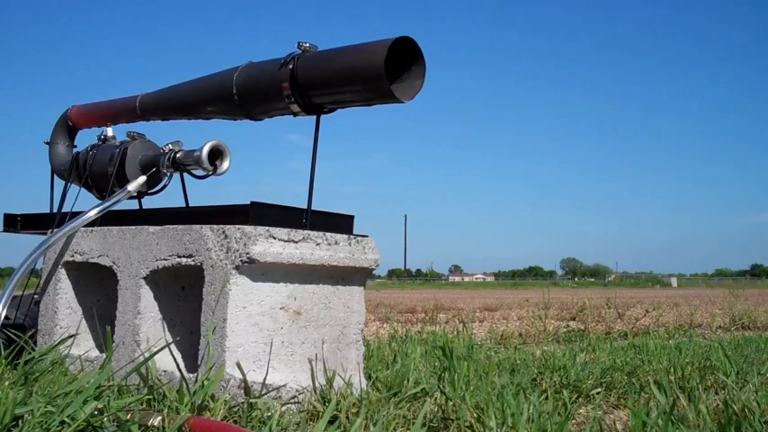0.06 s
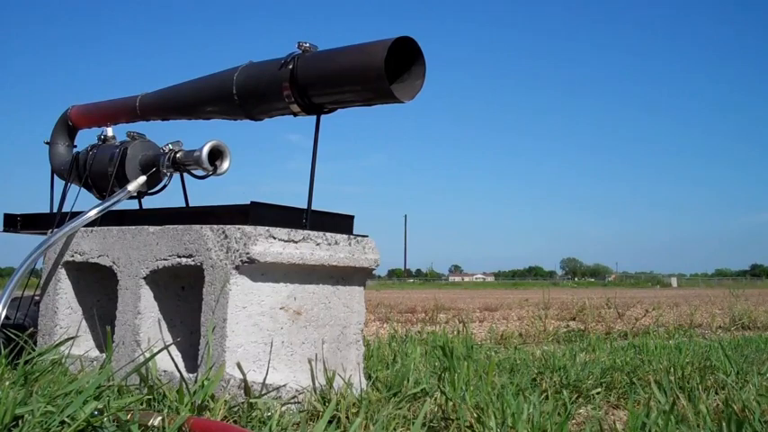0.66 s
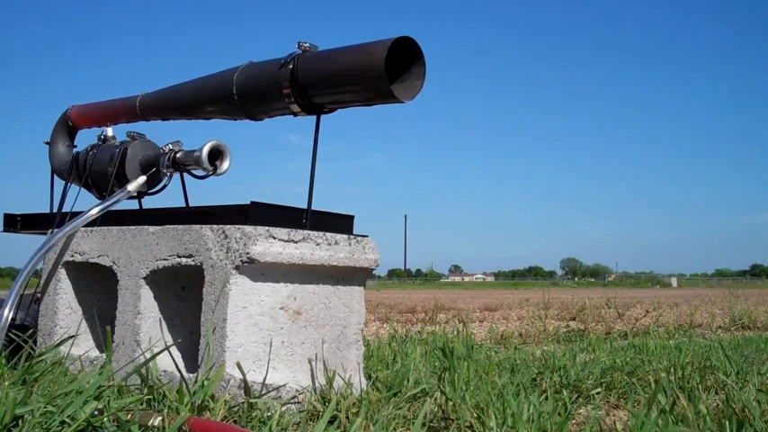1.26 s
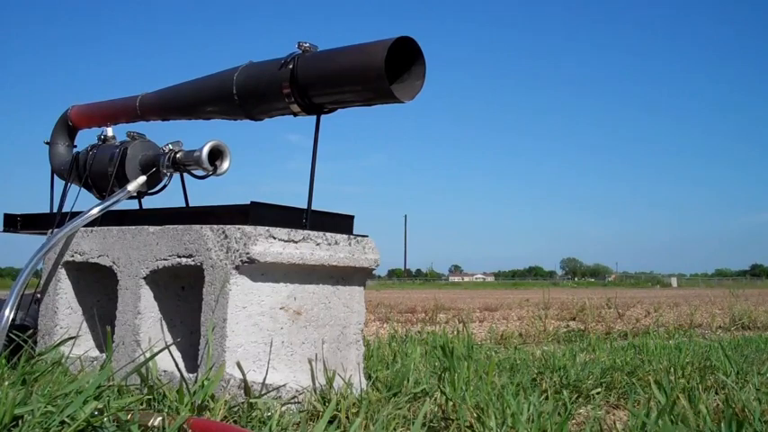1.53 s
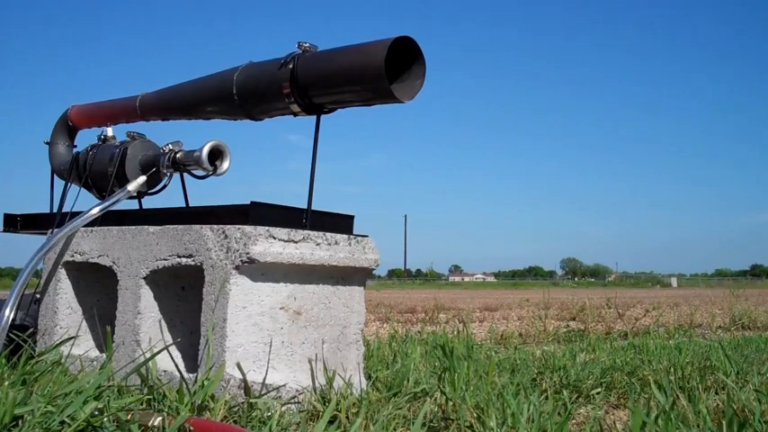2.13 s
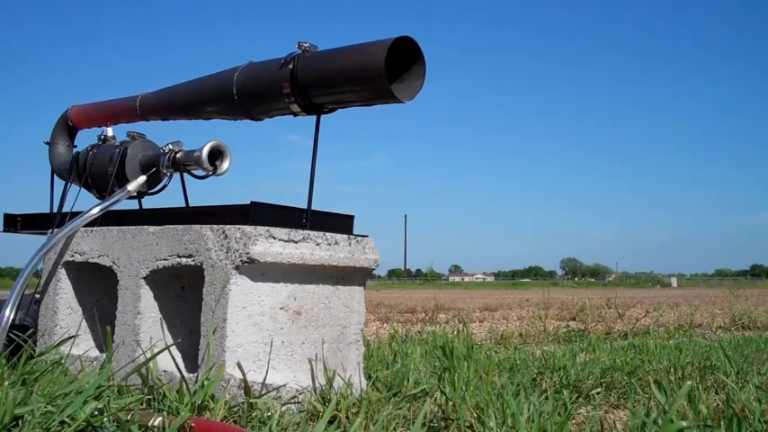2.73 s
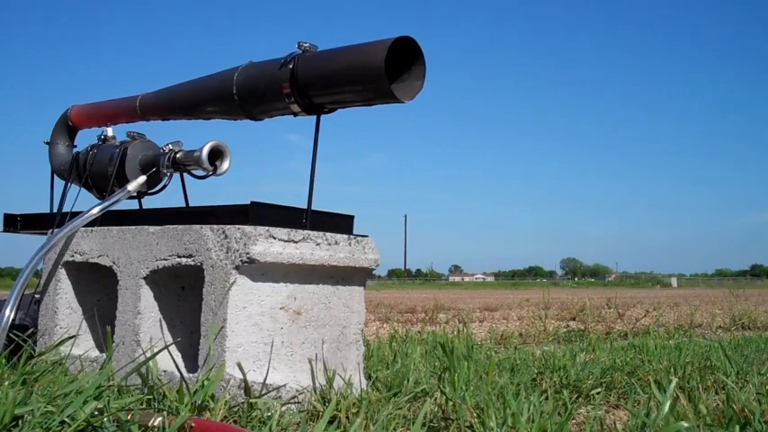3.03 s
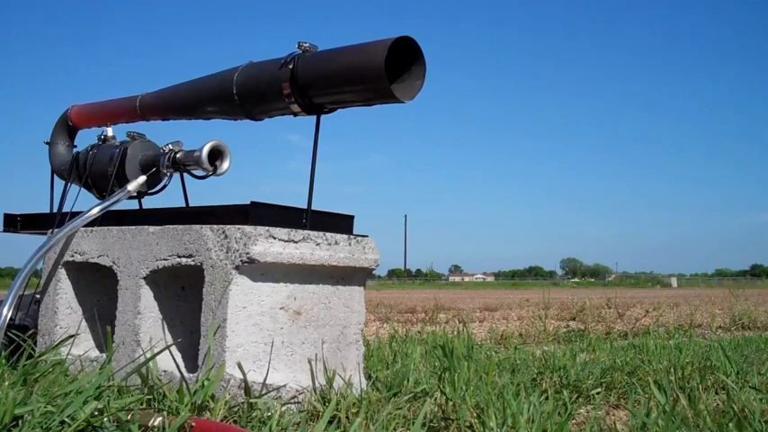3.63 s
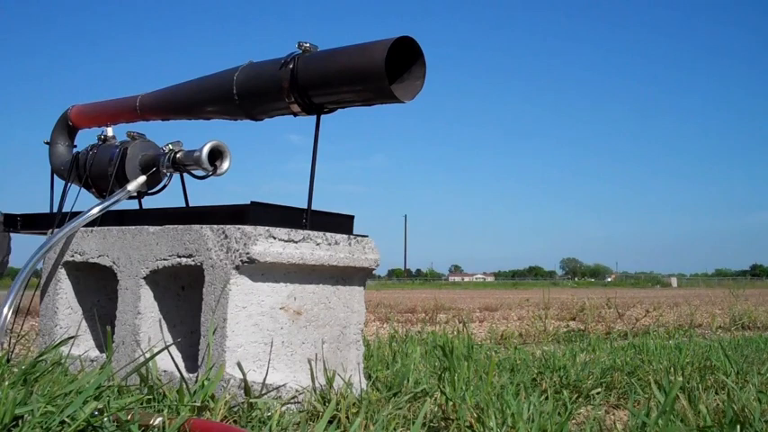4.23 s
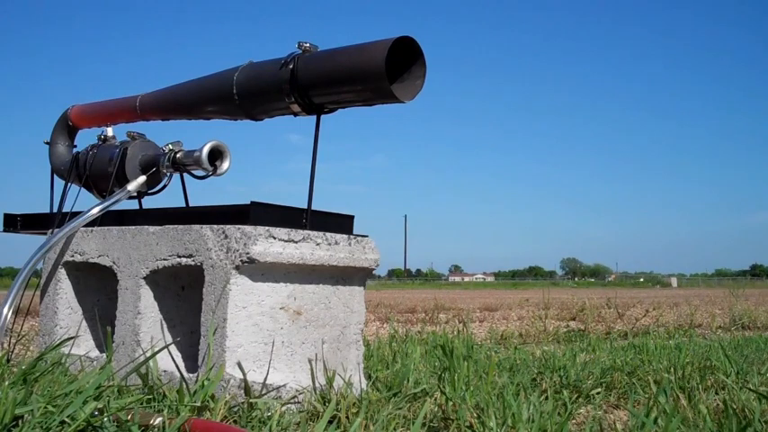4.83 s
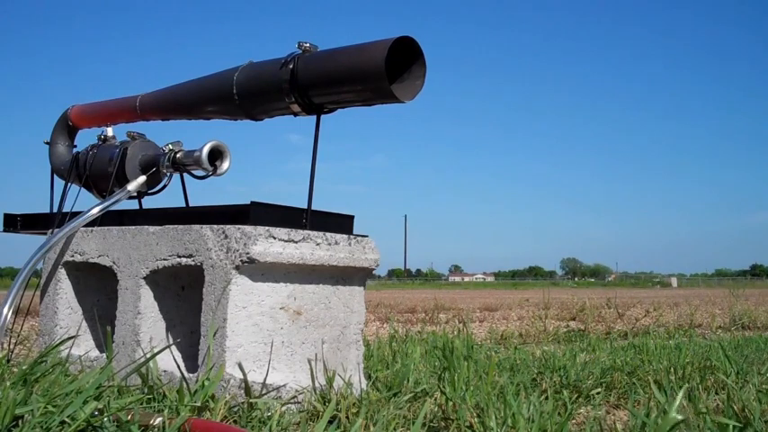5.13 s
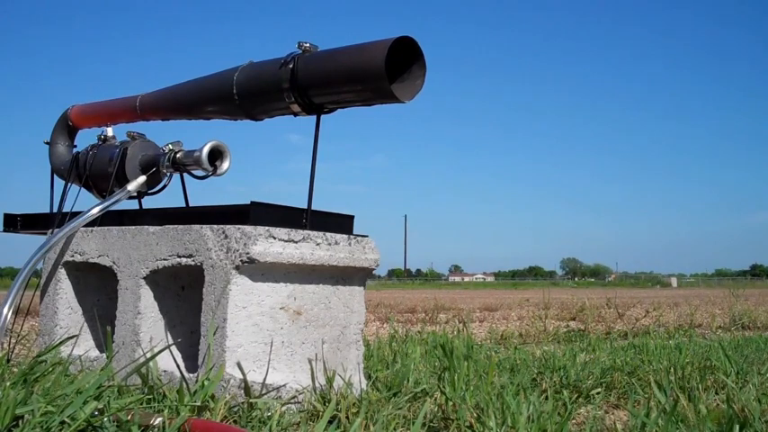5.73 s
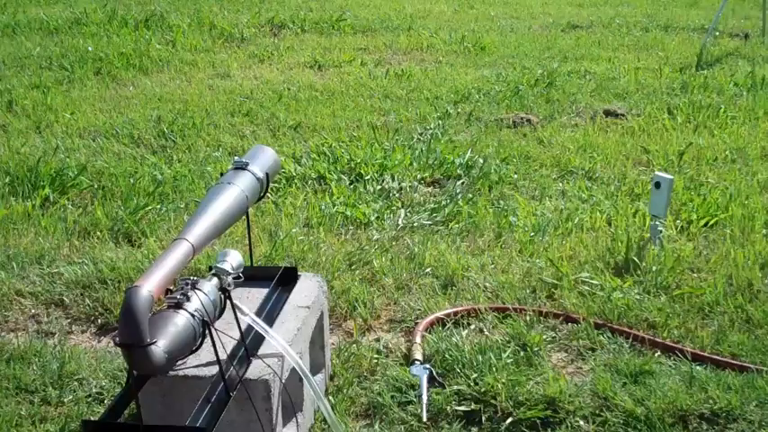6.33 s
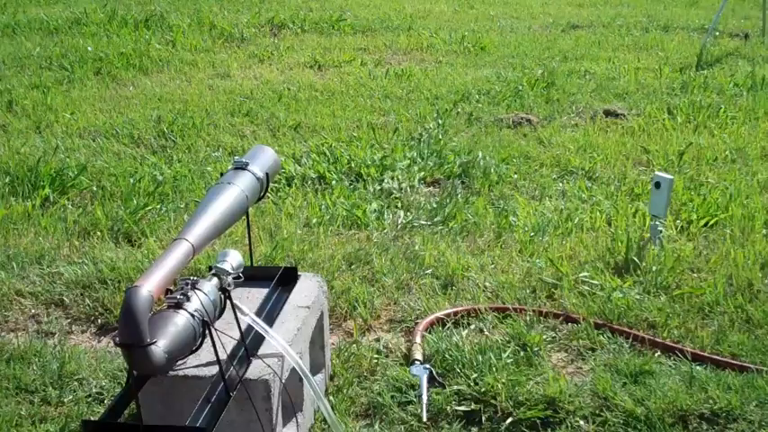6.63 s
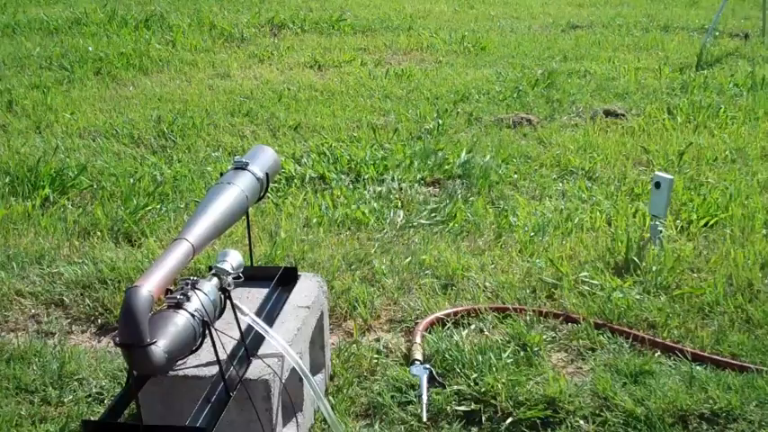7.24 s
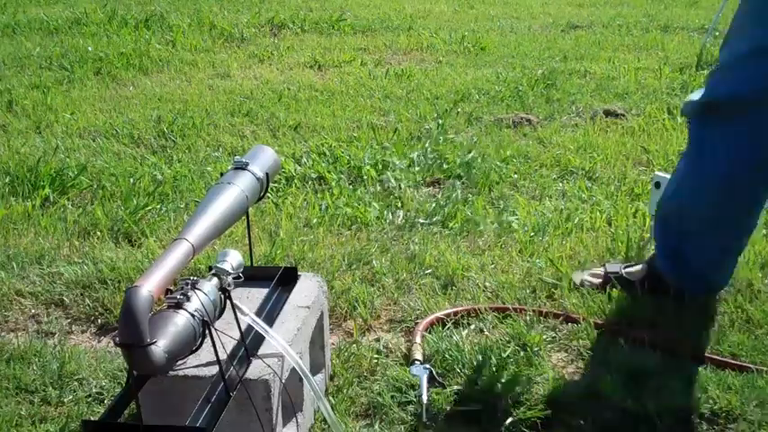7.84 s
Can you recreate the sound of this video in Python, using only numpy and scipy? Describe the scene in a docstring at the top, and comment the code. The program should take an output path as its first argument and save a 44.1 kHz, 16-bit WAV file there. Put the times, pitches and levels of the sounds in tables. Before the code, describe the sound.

A small pulse jet engine running very close in an open field, a loud, harsh, distorted buzzing roar at one steady pitch.

```python
"""A small valveless pulse jet buzzes in an open field from the first instant, hunting around 214 firings a
second. In each cycle the gas column swings like a sine, the intake roars, then a shock front and a
turbulent blast leave the ringing tailpipe. The microphone is so close that it overloads: the wave is
squared off, then thinned by the bass cut. Near 4 s the intake sucks hardest, near 5.6 s the shocks
peak, and in the last second the suction fades while the engine runs on."""
import sys
import numpy as np
from scipy import signal
from scipy.fft import rfft, irfft, next_fast_len
from scipy.io import wavfile

SR = 44100
rng = np.random.default_rng(int(sys.argv[2]) if len(sys.argv) > 2 else 0)


def wrap_up_sound(samples):
    """Save the sound to the file named by the first command line argument, as 16-bit audio."""
    columns = np.atleast_2d(samples).T
    # keep every value between -1 and 1, then stretch to whole-number steps
    tamed = np.clip(columns, -1, 1)
    steps = np.round(tamed * 32767).astype(np.int16)
    wavfile.write(sys.argv[1], SR, steps)


N = 347508


def from_db(db):
    """Decibels to gain."""
    return 10 ** (np.asarray(db) / 20)


def unit_rms(x):
    """Scale to rms 1."""
    return x / np.sqrt(np.mean(x ** 2) + 1e-20)


def automation(rows):
    """One curve per column of a timed table, gliding from row to row."""
    seconds, *columns = np.transpose(rows)
    return [np.interp(np.arange(N) / SR, seconds, column) for column in columns]


def eq_db(points, hz):
    """Read an EQ curve on a log-frequency axis."""
    points = np.array(points)
    return np.interp(np.log(hz + 1), np.log(points[:, 0]), points[:, 1])


def filtered(x, response):
    """Pass x through a frequency response given as a function of Hz."""
    size = next_fast_len(N + SR // 10)
    hz = np.arange(size // 2 + 1) * SR / size
    return irfft(rfft(x, size) * response(hz), size)[..., :N]


def shaped_noise(response):
    """White noise through a frequency response; rms 1."""
    return unit_rms(filtered(rng.standard_normal(N), response))


def noise(spectrum):
    """Noise coloured by an EQ curve; rms 1."""
    return shaped_noise(lambda hz: from_db(eq_db(spectrum, hz)))


def drift(width_hz, centre_hz=0):
    """Smooth random modulation at rates within about width_hz of centre_hz; rms 1."""
    return shaped_noise(lambda hz: 1 / (1 + ((hz - centre_hz) / width_hz) ** 4))


def per_firing(cycles):
    """Sample and hold: one normal draw for each firing."""
    return rng.standard_normal(N // 100)[np.maximum(cycles, 0).astype(int)]


def bell_gate(cycles, centre, width):
    """A bell-shaped opening once a firing; centre and width in cycles."""
    away = (cycles - centre + .5) % 1 - .5
    return np.exp(-.5 * (away / width) ** 2)


# The engine's base pitch. Each row: time in seconds, firing rate in Hz.
FIRING_RATE = [(0.0, 213.7), (2.76, 214.2), (2.86, 212.1), (2.96, 213.9), (3.54, 210.8), (4.04, 215.5),
               (4.54, 213.2), (5.6, 214.8), (5.72, 213.1), (5.9, 215.5), (6.0, 212.8), (6.16, 215.3),
               (6.44, 213.9), (6.74, 216.1), (6.96, 213.5), (7.38, 214.2), (7.58, 212.1), (7.88, 214.1)]


def firing_clock(hunt, hunt_hz=0.594, wander_cycles=0.017):
    """Running count of cycles: the rate hunts, and the firing runs a little ahead of or behind its beat."""
    base_hz, = automation(FIRING_RATE)
    beat = 1 + np.cumsum(base_hz + hunt_hz * hunt) / SR
    return beat + wander_cycles * drift(width_hz=37.5)


def gas_column(cycles, mean_pressure):
    """The fundamental: the gas swings about a wandering mean. Its amplitude is one 'swing' of pressure."""
    return mean_pressure + 0.024 * drift(width_hz=26) - np.sin(2 * np.pi * cycles)


# Colour of the intake turbulence. Each row: frequency in Hz, relative noise density in dB.
INTAKE_SPECTRUM = [(40, -4), (300, -12), (680, -10), (970, -5), (1400, 0.5), (2000, -8), (3700, -9),
                   (7000, -19), (14000, -29)]


def intake_roar(envelope, flame_db=-33.5):
    """Turbulence swells as the intake opens, over a faint steady bed of flame noise."""
    return (envelope + from_db(flame_db)) * noise(INTAKE_SPECTRUM)


def shock_front(cycles, moment, height, rise_cycles=0.024, decay_cycles=0.13, rings_per_cycle=2.9):
    """A steep front, its height new at each firing, that dies away while the pipe mouth rings."""
    age = cycles % 1 - moment
    after = np.maximum(age, 0)
    attack = .5 + .5 * np.tanh(age / rise_cycles)
    decay = np.exp(-after / decay_cycles)
    ring = 1 + 0.21 * np.cos(2 * np.pi * rings_per_cycle * after)
    return height * (1 + 0.063 * per_firing(cycles)) * attack * decay * ring


# Fader ride on the tailpipe blast. Each row: time in seconds, base level in dB.
BLAST_LEVEL = [(0, -13), (0.4, -9), (1.1, -10), (1.95, -7), (2.2, -12), (2.7, -11.5), (3.55, -14),
               (3.95, -9.5), (4.9, -12.5), (5.5, -14), (5.75, -13), (6.45, -13.5), (7.88, -15)]
# Colour of the blast's turbulence. Each row: frequency in Hz, relative noise density in dB.
BLAST_SPECTRUM = [(40, -23), (300, -26), (900, -12.5), (1900, -5.5), (2600, 4), (3000, -0.5), (3400, 3.5),
                  (4150, -3), (4550, -1), (5100, -6.5), (7000, -6), (14000, -31)]


def tailpipe_blast(cycles, moment, hunt, lag_cycles=0.15, hunt_db=0.77, spread_db=1.5):
    """The long tailpipe blows a bright, turbulent puff after each shock; returns sound and envelope."""
    base_db, = automation(BLAST_LEVEL)
    level_db = base_db + hunt_db * hunt + spread_db * per_firing(cycles)
    envelope = bell_gate(cycles, moment + lag_cycles, width=0.12) * from_db(level_db)
    return envelope * noise(BLAST_SPECTRUM), envelope


# The pipe's resonances. Each row: pitch in Hz, bandwidth in Hz, base level in dB.
PIPE_RESONANCES = [(444.6, 11, -35), (898, 71, -25), (1310, 77, -21.5), (3445, 240, -33)]


def pipe_hum():
    """Higher modes of the pipe, kept ringing through the whole cycle by the flame."""
    hum = 0
    for mode_hz, width_hz, level_db in PIPE_RESONANCES:
        mode = shaped_noise(lambda hz: hz / (hz * width_hz + 1j * (hz ** 2 - mode_hz ** 2)))
        hum = hum + from_db(level_db) * mode
    return hum


# The fizz of the finest eddies. Each row: frequency in Hz, relative noise density in dB.
EDDY_SPECTRUM = [(100, 0), (1000, 0), (3500, -1.5), (7000, -4.5), (10000, 3.5), (14000, 4.5)]


def fine_eddies(envelope, gain_db=-4.0):
    """Stereo fizz: eddies so small that they differ between the two microphone ports."""
    return from_db(gain_db) * envelope * np.array([noise(EDDY_SPECTRUM), noise(EDDY_SPECTRUM)])


# How hard the engine burns. Each row: time in seconds, then mean pressure, base shock height and
# intake suction (negative), all three in swings of the gas column.
COMBUSTION_CURVES = [(0, -0.029, 1.09, -0.95), (1.3, 0.039, 0.95, -0.84), (2.7, 0.046, 0.98, -1.02),
                     (3.45, 0.036, 0.81, -0.62), (4.0, 0.14, 1.18, -2.4), (4.55, 0.059, 1.07, -1.85),
                     (5.05, -0.092, 1.37, -1.5), (5.3, -0.18, 1.17, -0.66), (5.55, -0.26, 1.56, -0.75),
                     (6.0, -0.077, 0.96, -0.69), (6.35, -0.0041, 1.27, -1.64), (6.72, -0.12, 1.07, -0.32),
                     (7.1, -0.13, 1.09, -0.84), (7.5, -0.16, 0.99, -0.055), (7.88, -0.21, 0.98, -0.093)]


def pulse_jet(intake_lead_cycles=0.16, roar_db_per_swing=3.5, hum_db_per_swing=5.5):
    """The firings drive every layer; returns the pressure at the two microphone ports, in swings."""
    mean_pressure, height, suction = automation(COMBUSTION_CURVES)
    # the engine hunts, nearly regularly: as the firing speeds up, shock and blast grow
    hunt = drift(width_hz=1.521, centre_hz=3.333)
    height = height * (1 + 0.034 * hunt)
    cycles = firing_clock(hunt)
    swing = gas_column(cycles, mean_pressure)
    # a higher shock comes earlier in the cycle, with a louder roar and hum
    excess = height - 1
    moment = 0.3409 - 0.057 * excess
    # no two charges burn alike, so the shock's timing wanders and jitters
    moment = moment + 0.0066 * drift(width_hz=26) + 0.0084 * per_firing(cycles)
    # the short intake breathes ahead of the shock
    intake_open = bell_gate(cycles, moment - intake_lead_cycles, width=0.088)
    intake_envelope = intake_open * from_db(-3.5 + roar_db_per_swing * excess)
    front = shock_front(cycles, moment, height)
    blast, blast_envelope = tailpipe_blast(cycles, moment, hunt)
    roar = intake_roar(intake_envelope)
    hum = from_db(hum_db_per_swing * excess) * pipe_hum()
    eddies = fine_eddies(blast_envelope + 0.58 * intake_envelope)
    return swing + suction * intake_open + roar + front + blast + hum + eddies


def scene():
    """The engine alone: the open field gives no echo."""
    return pulse_jet()


def overload(pressure, drive=2.88, ceiling=0.47, knee=3.7):
    """The microphone saturates at its ceiling; a higher knee makes the corner harder."""
    driven = drive * pressure
    return ceiling * driven / (1 + np.abs(driven) ** knee) ** (1 / knee)


# The microphone's tone. Each row: frequency in Hz, gain in dB.
MICROPHONE_EQ = [(30, -2), (214, 0), (320, -2.5), (430, -0.5), (620, 4), (730, -1.5), (870, 2),
                 (1500, -0.5), (1900, -1.5), (3400, -0.5), (5000, -1.5), (6500, -3.5), (8000, -9),
                 (9500, -9.5), (12000, -24.5), (14200, -40), (15500, -40)]
# Its stereo balance. Each row: frequency in Hz, left minus right in dB.
BALANCE_EQ = [(60, -5), (110, 1), (190, 0.5), (350, 0), (630, 0), (1140, 0), (2050, 1), (3680, 0.0),
              (6640, -1), (12000, -3)]


def microphone_colour(x, lag_samples=0.8):
    """Each port colours the sound a little differently, and the right one hears it slightly late."""
    sides = np.array([[.5], [-.5]])

    def response(hz):
        gain = from_db(eq_db(MICROPHONE_EQ, hz) + sides * eq_db(BALANCE_EQ, hz))
        return gain * np.exp(2j * np.pi * hz * sides * lag_samples / SR)
    return filtered(x, response)


# Colour of the hiss bed. Each row: frequency in Hz, relative noise density in dB.
HISS_SPECTRUM = [(30, -18), (150, 7), (1000, 18), (4000, 5), (7000, -8), (10000, -3), (12000, -10),
                 (14200, -18), (15500, -48)]


def hiss(level_db=-36):
    """A thin steady hiss under the engine, separate on each side."""
    return from_db(level_db) * np.array([noise(HISS_SPECTRUM), noise(HISS_SPECTRUM)])


def record(dry, bass_cut_hz=448, waver_db=0.32, top_cut_hz=15800):
    """Overload, bass cut, a slight level waver and colour; then a thin steady hiss and a top cut."""
    squared = overload(dry)
    squared = squared - squared.mean(axis=1, keepdims=True)
    # the bass cut makes every flat top sag towards zero
    thin = signal.sosfilt(signal.butter(1, bass_cut_hz, "high", fs=SR, output="sos"), squared)
    wavering = thin * from_db(waver_db * drift(width_hz=42))
    top_cut = signal.cheby2(12, 70, top_cut_hz, fs=SR, output="sos")
    return signal.sosfilt(top_cut, microphone_colour(wavering) + hiss())


dry = scene()
out = record(dry)
wrap_up_sound(out)
```